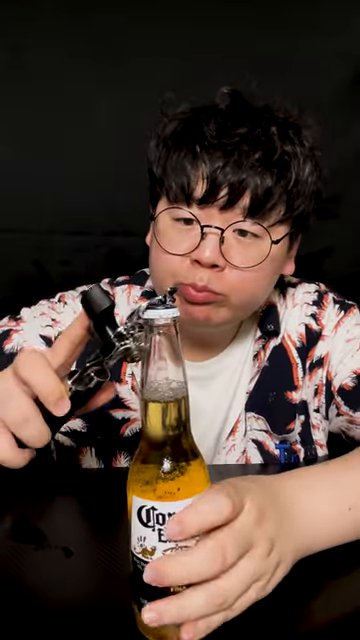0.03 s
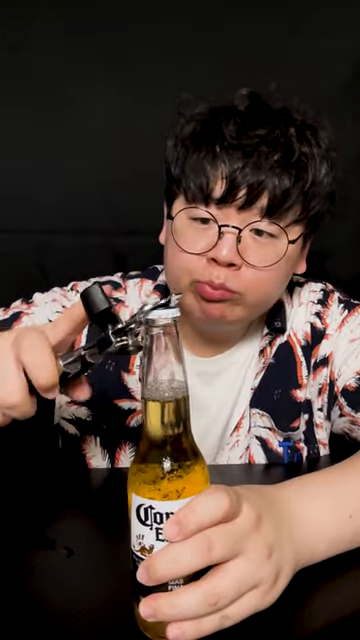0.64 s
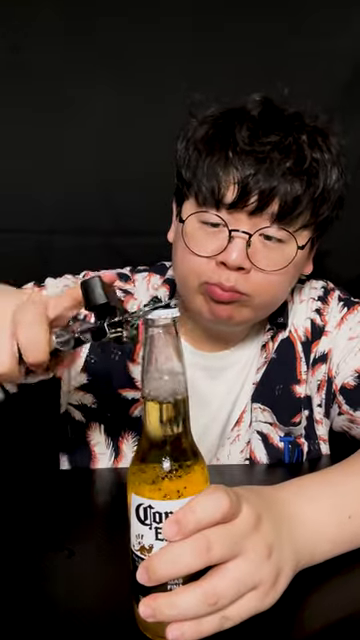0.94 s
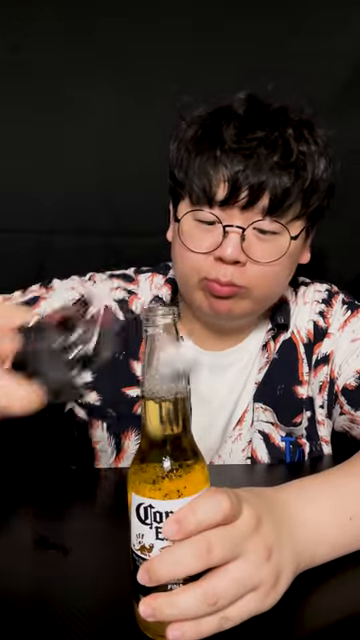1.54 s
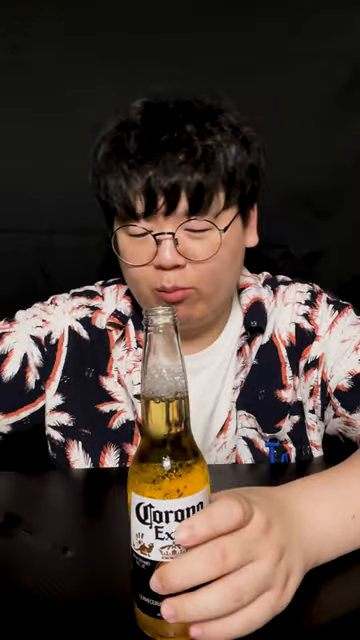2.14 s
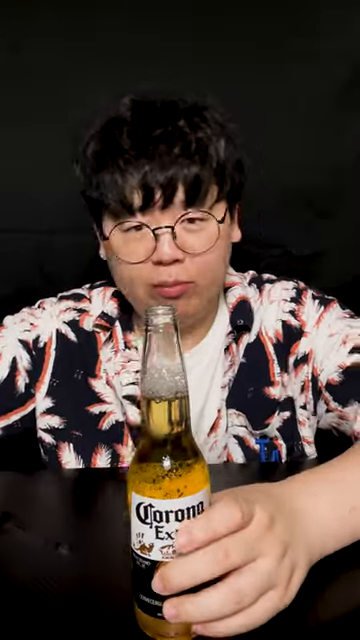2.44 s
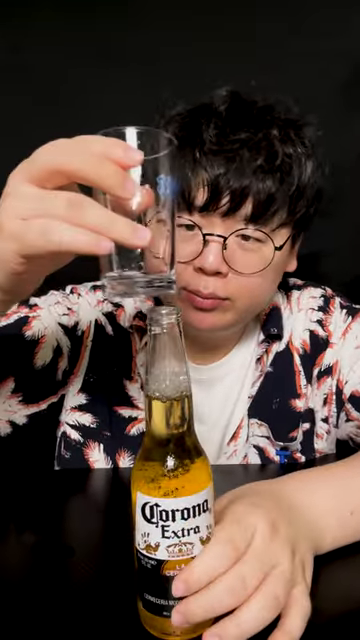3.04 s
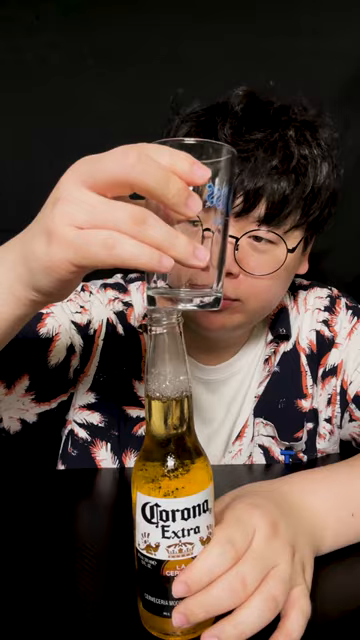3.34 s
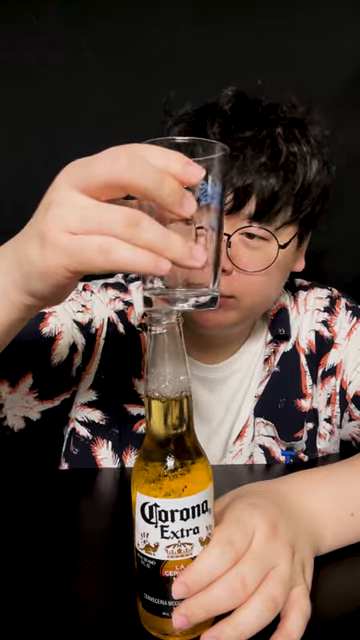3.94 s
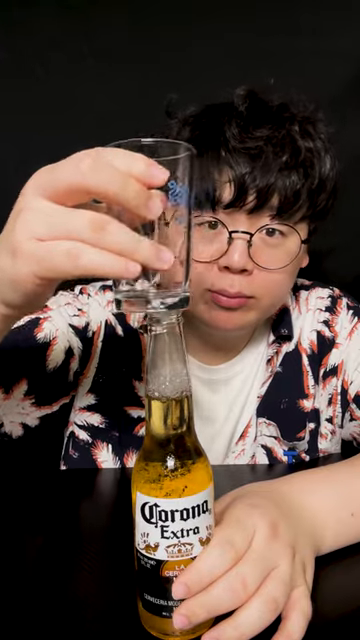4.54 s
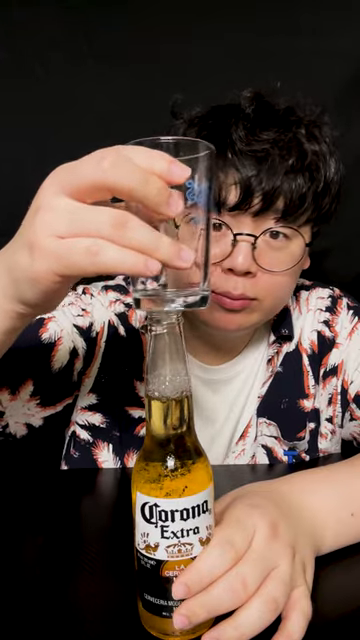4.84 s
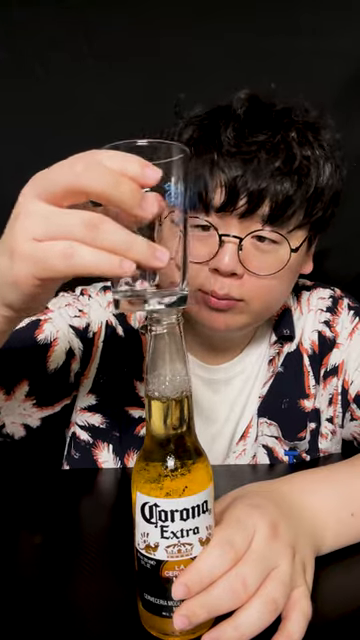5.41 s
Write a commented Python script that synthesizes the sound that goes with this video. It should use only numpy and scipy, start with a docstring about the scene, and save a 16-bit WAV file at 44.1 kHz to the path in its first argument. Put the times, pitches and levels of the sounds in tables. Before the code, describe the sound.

A steel opener clicks against a beer bottle's cap and gas escapes in a short, bright hiss. The bottle bumps the table, then the cap scrapes free, bounces with high metallic rings and rocks to rest. After a brief pause, a drinking glass is set on the bottle's mouth and slides about, knocking and grinding over a faint hollow tone. Everything is close to the microphone in a small, quiet room.

```python
"""A beer bottle is opened on a table in a small room. The steel opener bites and the bottle bumps the
table; gas hisses through the crimp. The crown cap drags off the opener, bounces and skids on the
table, rings in the air between landings and rocks to rest. Then the base of a drinking glass is set on
the bottle's mouth and slides about, knocking and grinding, while the air in the neck sings."""
import sys
import numpy as np
from scipy import signal
from scipy.fft import rfft, irfft
from scipy.io import wavfile

SR = 44100
rng = np.random.default_rng(int(sys.argv[2]) if len(sys.argv) > 2 else 0)


def master(y):
    """Save y as 16-bit WAV."""
    cut = np.clip(np.atleast_2d(y).T, -1, 1)
    pcm = np.round(cut * 32767)  # scale
    wavfile.write(sys.argv[1], SR, pcm.astype(np.int16))


N = 245637
TIME_S = np.arange(N) / SR
BINS_HZ = np.maximum(np.fft.rfftfreq(2 ** 19, 1 / SR), 1)


def from_db(db):
    """Decibels to amplitude."""
    return 10 ** (np.asarray(db) / 20)


def at_hz(rows, hz):
    """Table columns interpolated over log frequency."""
    points, *columns = np.transpose(rows)
    return np.squeeze([np.interp(np.log(hz), np.log(points), c) for c in columns])


def spectrum_of(x):
    """Zero-padded spectrum on BINS_HZ."""
    return rfft(x, 2 * (len(BINS_HZ) - 1))


def colour(x, spectrum):
    """Minimum-phase filter that keeps the power of white noise."""
    cepstrum = irfft(np.log(from_db(at_hz(spectrum, BINS_HZ))))[:len(BINS_HZ) - 1]
    cepstrum[1:] *= 2
    response = np.exp(spectrum_of(cepstrum))
    response /= np.sqrt(np.mean(abs(response) ** 2))
    return irfft(spectrum_of(x) * response)[..., :N]


def noise_pair():
    """Two independent white noises."""
    return rng.standard_normal((2, N))


def drift(rate_hz):
    """Random wander between unit-variance knots."""
    knots = rng.standard_normal(int(rate_hz * N / SR) + 2)
    return np.interp(TIME_S * rate_hz, np.arange(len(knots)), knots)


def clicks(times_s, levels_db):
    """One impulse per contact."""
    out = np.zeros(N)
    out[np.round(np.asarray(times_s) * SR).astype(int)] = from_db(levels_db)
    return out


def ring(force, hz, t60_s, rise_s=0):
    """Damped complex mode with a smoothed onset; a plain envelope at 0 Hz."""
    turn = np.exp(2j * np.pi * hz / SR)
    tone = signal.lfilter([1], [1, -from_db(-60 / (t60_s * SR)) * turn], force + 1e-18)
    lag = np.exp(-1 / (rise_s * SR)) if rise_s else 0
    return signal.lfilter([1 - lag], [1, -lag * turn], tone)


def bursts(times_s, levels_db, t60_s, rise_s=0):
    """Dense modes of a damped body: two noises decaying after each blow."""
    return ring(clicks(times_s, levels_db), 0, t60_s, rise_s).real * noise_pair()


# left-right likeness: f/Hz, correlation
STEREO_LIKENESS = [(100, 0.99), (300, 0.99), (700, 0.72), (1500, 0.28), (3000, 0.054), (6000, 0.22),
                   (12000, 0.83)]
def spread(pair):
    """Two independent signals become left and right, alike in the bass."""
    alike = np.clip(at_hz(STEREO_LIKENESS, BINS_HZ), -.9, 1)
    mid, side = pair
    side = irfft(spectrum_of(side) * np.sqrt((1 - alike) / (1 + alike)))[:N]
    return np.array([mid + side, mid - side])


# microphone ports, left against right: f/Hz, level/dB, lead/rad
MIC_PORTS = [(193.7, 14, -1), (613.4, -5.5, 0.4), (1050, -2, -0.07), (1705, -3.5, -0.12), (2400, -4.5, 1),
             (3560, 4.5, 2), (4670, 4.5, 1.5), (5500, 4.5, 1.18), (6830, -0.5, 2), (9150, 2.5, 3),
             (11420, 0, 0.88), (15000, -0.5, 1)]
def ports(tone, hz):
    """A complex tone reaches the two ports with different level and phase."""
    pan_db, lead_rad = at_hz(MIC_PORTS, hz)
    half = np.array([[.5], [-.5]])
    return np.imag(tone * from_db(pan_db * half) * np.exp(1j * lead_rad * half))


def wavering_ring(force, hz, t60_s, rise_s, shift_hz):
    """A mode pulled to and fro in pitch by a shifting contact."""
    turn = np.exp(2j * np.pi * np.cumsum(shift_hz * drift(40)) / SR)
    return ports(ring(force / turn, hz, t60_s, rise_s) * turn, hz)


# background noise: f/Hz, level/dB
HUSH_SPECTRUM = [(20, -26), (40, -11.5), (60, -6.5), (160, -6.5), (280, -16), (500, -24), (1000, -32),
                 (2400, -29.5), (4500, -51), (8000, -65.5), (16000, -81.5)]
def hush(level_db=-56.5, drop_db=5.5, drop_at_s=2.906, drop_length_s=0.045):
    """Low background noise, turned down by the recorder's noise suppressor near 2.9 s."""
    dropped = np.clip((TIME_S - drop_at_s) / drop_length_s, 0, 1)
    return from_db(level_db - drop_db * dropped) * spread(colour(noise_pair(), HUSH_SPECTRUM))


# opener and hand on the bottle: t/s, click level/dB, knock level/dB
OPENER_HITS = [(0.0727, -31, -33.5), (0.191, -58.5, -39), (0.21, -88, -47.5), (0.379, -69, -55.5),
               (1.0581, -76, -42), (1.107, -65.5, -46), (1.3497, -75, -37.5), (1.3778, -54, -51),
               (1.4956, -39.5, -47), (2.8189, -99, -47)]
# opener's knock; metal jangle of opener and cap: f/Hz, level/dB
OPENER_SPECTRUM = [(35, -33.5), (60, 0), (231, 0), (642, -11.5), (778, -12.5), (1100, -23), (1260, -17),
                   (1560, -27.5), (2470, -26.5), (2940, -33.5), (3710, -60.5), (4000, -44), (6000, -51.5),
                   (7800, -66.5), (13200, -120)]
JANGLE_SPECTRUM = [(3000, -19.5), (6000, 5), (8200, -16.5), (11000, 4.5), (14000, -1), (16000, -5.5)]
# steel opener: f/Hz, level/dB, t60/s
STEEL_MODES = [(1228, -6, 0.12), (2080, -2.5, 0.025), (2826, 0.5, 0.03), (3730, -6, 0.049)]
def opener():
    """Steel bites on the cap with a knock and a click, and rings."""
    times_s, click_db, knock_db = np.transpose(OPENER_HITS)
    knock = colour(bursts(times_s, knock_db + 0.5, t60_s=0.14, rise_s=0.0017), OPENER_SPECTRUM)
    click = colour(bursts(times_s, click_db - 1.5, t60_s=0.02), JANGLE_SPECTRUM)
    strike_db = (click_db + knock_db) / 2
    steel = sum(ports(ring(clicks(times_s, strike_db + mode_db), hz, t60_s), hz)
                for hz, mode_db, t60_s in STEEL_MODES)
    return spread(knock + click) + steel


# bottle on the table: t/s, level/dB, f/Hz
BOTTLE_BUMPS = [(0.079, -43, 163), (0.205, -28, 165), (0.242, -35.5, 188), (1.058, -22, 122),
                (1.113, -22, 105.7), (1.141, -32, 71), (3.214, -26, 149.4)]
def bottle_bumps(t60_s=0.057, rise_s=0.0032):
    """The hand's effort bumps the bottle softly on the table."""
    return sum(ring(clicks([at_s], db), hz, t60_s, rise_s).imag for at_s, db, hz in BOTTLE_BUMPS)


# gas jet: f/Hz, level/dB
GAS_SPECTRUM = [(180, -66), (300, -19), (348, -19), (439, -29.5), (517, -24), (922, -29), (1510, -24),
                (2560, -11.5), (3070, -26.5), (3230, -18.5), (5480, -8), (6680, -10), (8280, -30),
                (10300, -0.5), (15500, 0)]
def gas(start_s=0.7955, attack_s=0.047, hold_s=0.049, fall_db_per_s=516.5, jet_db=-21, darken_db=4.5):
    """A bright jet leaks through the crimp, darkening and dying as the pressure is spent."""
    age_s = TIME_S - start_s
    open_s = attack_s + hold_s
    flow = np.clip(age_s / attack_s, 0, 1) * from_db(-fall_db_per_s * np.clip(age_s - open_s, 0, .5))
    jet = flow * from_db(jet_db) * noise_pair()
    low = signal.sosfilt(signal.butter(1, 6000, fs=SR, output="sos"), jet)
    spent = np.clip(2 * (age_s - attack_s) / open_s - .5, -2, 2)
    return spread(colour(jet + low * (from_db(darken_db * spent) - 1), GAS_SPECTRUM))


# cap on the opener, then the table; edge is high edge-on, low when flat:
# t/s, ring level/dB, edge/dB, knock level/dB, crack level/dB
CAP_BOUNCES = [(1.38, -52, -3.5, -54, -55), (1.442, -45.5, -7.5, -56, -64.5),
               (1.4673, -38, -24.5, -59, -59), (1.4949, -26.5, -17.5, -39, -70),
               (1.509, -16, -17, -56, -44.5), (1.5463, -22, -18.5, -45, -34.5),
               (1.7103, -24.5, 1.5, -12.5, -26), (1.9992, -13, -12, -21, -49.5),
               (2.0655, -36, -10, -30, -32.5), (2.0797, -34.5, 0, -30.5, -37),
               (2.1448, -13, -19, -31, -32.5), (2.1575, -15, -6, -27, -27.5),
               (2.1716, -20, -10.5, -22, -24), (2.2113, -6.5, -36.5, -26.5, -17.5),
               (2.2173, -14.5, -23, -30.5, -22), (2.2282, -16.5, -33.5, -27, -26.5),
               (2.2625, -30, -26, -28, -39), (2.3236, -8.5, -30.5, -29, -18)]
def cap_contacts(rock_start_s=2.3762, first_gap_s=.0495, gap_ratio=.905, touches=6):
    """Columns of the bounces, then of the rocking to rest: each touch sooner and weaker."""
    k = np.arange(touches)
    times_s = rock_start_s + first_gap_s * (1 - gap_ratio ** k) / (1 - gap_ratio)
    ring_db = -23.5 - 6.5 * k
    edge_db = np.full(touches, -27)
    knock_db = -36.5 - 1.5 * k
    crack_db = -31.5 - 5.5 * k
    return np.hstack([np.transpose(CAP_BOUNCES), [times_s, ring_db, edge_db, knock_db, crack_db]])


# cap modes: f/Hz
CAP_MODES_HZ = [5385, 5600, 5632, 6800, 6865, 9350, 10800, 11560, 13170, 14380, 14890]
# same modes: level/dB, t60/s
CAP_MODE_DECAYS = [(-9, 0.041), (-5, 0.064), (-9, 0.11), (-20.5, 0.042), (5.5, 0.099), (7, 0.037),
                   (-4.5, 0.049), (-15, .08), (-2, 0.087), (-2, .05), (-3, 0.036)]
# cap's crack and rasp: f/Hz, level/dB
CRACK_SPECTRUM = [(1500, -20.5), (3000, 5), (5000, 13.5), (8000, -9.5), (12000, -1), (16000, -24)]
def cap(scatter_db=1.0):
    """Each contact cracks and rings the cap; edge-on, the high modes ring and the crimps jangle."""
    times_s, ring_db, edge_db, _, crack_db = cap_contacts()
    high_db = ring_db + edge_db
    middle_db = ring_db - 3 + 0.79 * edge_db
    jangle = bursts(times_s, high_db - 7.5, t60_s=0.026, rise_s=.0003)
    crack = bursts(times_s, crack_db + 4, t60_s=0.0086, rise_s=.0003)
    out = spread(colour(crack, CRACK_SPECTRUM) + colour(jangle, JANGLE_SPECTRUM))
    strike_spectra = [(5600, *ring_db), (6800, *middle_db), (13000, *high_db)]
    losses_db = scatter_db * rng.standard_normal((len(times_s), len(CAP_MODES_HZ)))
    for hz, (mode_db, t60_s), loss_db in zip(CAP_MODES_HZ, CAP_MODE_DECAYS, losses_db.T):
        force = clicks(times_s, at_hz(strike_spectra, hz) + mode_db - loss_db)
        out += wavering_ring(force, hz, t60_s, rise_s=0.0009, shift_hz=7.2)
    return out


def cap_drag(start_s=1.38, end_s=1.495, level_db=-66.5, teeth_db=7.0):
    """The loose cap's crimps rasp along the opener's jaw."""
    rasp = (TIME_S > start_s) * (TIME_S < end_s) * from_db(level_db + teeth_db * drift(270))
    return spread(colour(rasp * noise_pair(), CRACK_SPECTRUM))


# table top's thud and knock: f/Hz, level/dB
THUD_SPECTRUM = [(40, -21.5), (75, -13), (120, 0), (170, -4), (290, 0), (420, -2.5), (700, -10.5),
                 (1500, -20.5), (5000, -48.5)]
KNOCK_SPECTRUM = [(100, -34), (350, -9), (530, -3.5), (800, -0.5), (1250, -0.5), (1650, -9), (2200, 1),
                  (2700, 0.5), (3600, -10.5), (5000, -11.5), (8000, -43.5)]
# table top: f/Hz, level/dB, t60/s
TABLE_TOP_MODES = [(527.8, -10.5, 0.13), (786.4, -16, 0.21), (2180, -17, 0.23), (2300, -27.5, 0.36)]
def table_top(thud_limit_db=-27.5):
    """The table knocks and rings under the cap, thuds up to a limit, and rasps as the rim skids."""
    times_s, _, _, knock_db, _ = cap_contacts()
    rasp = skid_envelope(times_s, knock_db - 16)
    thud_db = np.minimum(knock_db - 8, thud_limit_db)
    low = bursts(times_s, thud_db, t60_s=0.093, rise_s=0.0014) + rasp * noise_pair()
    high = bursts(times_s, knock_db - 5, t60_s=0.084) + rasp * noise_pair()
    rings = sum(ports(ring(clicks(times_s, knock_db + mode_db - 0.5), hz, t60_s), hz)
                for hz, mode_db, t60_s in TABLE_TOP_MODES)
    return spread(colour(low, THUD_SPECTRUM) + colour(high, KNOCK_SPECTRUM)) + rings


def skid_envelope(times_s, kicks_db, start_s=1.95, end_s=2.4, glide_db=-52.5, slowing_db_per_s=19.5,
                  t60_s=0.25, teeth_db=6.5):
    """The cap skids on its crimped rim, slowing down; each landing adds a fading kick."""
    glide = from_db(glide_db - slowing_db_per_s * (TIME_S - start_s))
    kick_power = ring(clicks(times_s, 2 * kicks_db), 0, t60_s / 2).real
    skidding = (TIME_S > start_s) * (TIME_S < end_s)
    return skidding * (glide + np.sqrt(kick_power)) * from_db(teeth_db * drift(250))


# bounce that sets the cap ringing: t/s, level/dB
RINGING_BOUNCE = [(2.158, -19.5)]
# cap in the air: f/Hz, level/dB, t60/s
FLYING_CAP_MODES = [(4634, -6, .33), (6672, -4, .35), (6835, -6, .3), (7800, -17, .15), (9102, -5, .3),
                    (10920, -18, .25), (11605, 1, .36), (12705, -5, .28), (13670, -15, .3)]
def flying_cap(landing_s=2.32, damping_db_per_s=202):
    """After a bounce, the cap rings high and clear in the air until a landing damps it."""
    bounce = clicks(*np.transpose(RINGING_BOUNCE))
    damping = from_db(-damping_db_per_s * np.clip(TIME_S - landing_s, 0, 1))
    return damping * sum(ports(from_db(mode_db) * ring(bounce, hz, t60_s), hz)
                         for hz, mode_db, t60_s in FLYING_CAP_MODES)


# glass and bottle in contact: f/Hz, level/dB, t60/s
CONTACT_MODES = [(1628.6, 4, 0.039), (1694, 4, 0.061), (2428, -11.5, 0.046), (2715, -12, 0.068),
                 (3795, 6, 0.03), (3843, -5, 0.19), (4787, -10, 0.17), (6570, 0.5, .11),
                 (6720, -5.5, 0.074), (6810, -1.5, 0.22), (7680, -0.5, 0.071), (8070, -0.5, 0.095),
                 (8300, -19.5, .1), (12400, -15, 0.074), (13500, -12.5, .11), (15330, -14, .11)]
def glass_mode(force, hz, t60_s, rise_s, detune_hz=15):
    """The bottle's lip detunes a mode of the glass, the more so the more it damps it."""
    return wavering_ring(force, hz, t60_s, rise_s, detune_hz * np.sqrt(CONTACT_MODES[0][2] / t60_s))


# glass on the bottle's mouth: t/s, level/dB, wall clink/dB re level, hardness/dB re level
GLASS_KNOCKS = [(3.2096, -19, -18.5, -16), (3.2254, -44, 0.5, -2.5), (3.3967, -36, -23, -25.5),
                (3.5265, -30.5, -16.5, -39), (3.5418, -34.5, -16, -21.5), (3.6038, -31.5, -15, -25),
                (3.6411, -29, 2.5, -8), (3.7467, -34, -39, -26), (3.861, -26, -31, -20.5),
                (3.8742, -32.5, -31, -28), (4.0901, -38, -12, -27), (4.2602, -37, -3.5, -26),
                (4.2975, -32, -18, -27.5), (4.366, -39.5, -35, -36), (4.5343, -41.5, -13, -32),
                (4.6466, -38.5, -3, -20), (4.814, -30.5, -23, -30.5), (5.0023, -38, -9, -27),
                (5.013, -29.5, -0.5, -17), (5.1423, -33.5, -38, -30), (5.212, -24.5, -14, -26),
                (5.464, -25.5, 0.5, -18.5), (5.5575, -33, -31, -26)]
# contact crunch; body of the glass: f/Hz, level/dB
CRUNCH_SPECTRUM = [(1000, -9.5), (2600, -5.5), (3700, 10.5), (4300, -6), (5800, -11.5), (6700, -9.5),
                   (8300, -8), (9500, -52.5), (14000, -26)]
BODY_SPECTRUM = [(40, -36.5), (90, -1.5), (180, 0.5), (340, 9.5), (700, 1.5), (1050, 6.5), (1400, -13.5),
                 (1900, -3), (2700, -16.5), (3600, -19.5), (4500, -69), (8000, -74), (10000, -50)]
def glass_knocks(scatter_db=1.5):
    """The glass rocks and drops on the lip with a crunch; harder contacts reach higher modes."""
    times_s, clunk_db, wall_db, hardness_db = np.transpose(GLASS_KNOCKS)
    clink_db = clunk_db + wall_db
    sparkle_db = clunk_db + hardness_db
    crunch = colour(bursts(times_s, clink_db - 7, t60_s=0.071, rise_s=0.0022), CRUNCH_SPECTRUM)
    body = colour(bursts(times_s, clunk_db - 2, t60_s=0.086, rise_s=0.0018), BODY_SPECTRUM)
    out = spread(body + crunch)
    strike_spectra = [(1700, *clunk_db), (2500, *clunk_db), (3800, *clink_db), (6700, *sparkle_db)]
    chance_db = scatter_db * rng.standard_normal((len(times_s), len(CONTACT_MODES)))
    for k, (hz, mode_db, t60_s) in enumerate(CONTACT_MODES):
        force = clicks(times_s, at_hz(strike_spectra, hz) + mode_db + chance_db[:, k])
        polarity = (-1) ** k   # opposed neighbours swell, then beat
        out += polarity * glass_mode(force, hz, t60_s, rise_s=0.0009)
    return out


RUB_START_S, RUB_DB = 3.3, -56.5
# harder scrapes on the lip: t/s, level/dB
LIP_SCRAPES = [(3.383, -47), (3.554, -41), (3.75, -54), (3.846, -39.5), (4.114, -44.5), (4.36, -52.5),
               (4.685, -49), (4.783, -44.5), (5.16, -46), (5.56, -48)]
def rub_envelope(attack_s=.015, release_s=0.04):
    """How hard the glass grinds: a steady rub, and scrapes that swell and relax."""
    swells = sum(from_db(db) * np.exp(-np.maximum((at_s - TIME_S) / attack_s, (TIME_S - at_s) / release_s))
                 for at_s, db in LIP_SCRAPES)
    return (TIME_S > RUB_START_S) * np.hypot(from_db(RUB_DB), swells)


# glass grinding on glass: f/Hz, level/dB
GRIND_SPECTRUM = [(50, -26.5), (150, 5.5), (350, 4.5), (800, 6), (1350, -2), (2400, -10), (3500, -20),
                  (4400, -62), (8000, -42.5), (10000, -57)]
def glass_slide(grind_db=-1.5, grit_db=6.5, sizzle_db=-28.5, grain_db=4.5, catch_db=7.0, ring_db=-26.0,
                tilt_db_per_octave=-9.0):
    """Glass grinds on glass with a fine sizzle; tiny catches of the lip keep the modes ringing."""
    rub = rub_envelope()
    friction = rub * noise_pair()
    sizzle = rub * from_db(sizzle_db + grain_db * drift(400)) * noise_pair()
    grind = friction * from_db(grind_db + grit_db * drift(120))
    out = spread(colour(grind, GRIND_SPECTRUM) + colour(sizzle, CRUNCH_SPECTRUM))
    catches = friction[0] * from_db(catch_db * drift(200))
    lowest_hz, _, lowest_t60_s = CONTACT_MODES[0]
    for hz, mode_db, t60_s in CONTACT_MODES:
        softness_db = tilt_db_per_octave * min(np.log2(hz / lowest_hz), 2)   # rubbing is a soft contact
        gain = from_db(mode_db + ring_db + softness_db) * np.sqrt(lowest_t60_s / t60_s)
        out += gain * glass_mode(catches, hz, t60_s, rise_s=0.0013)
    return out


# glass tilting on the lip: t/s, pitch rise/Hz
GLASS_TILTS = [(3.487, 169.3), (3.691, 141), (4.17, 70), (4.31, 70), (4.504, 130), (4.89, 115),
               (5.119, 71.8), (5.38, 81.2)]
def neck_air(rest_hz=1034, wobble=0.024, tilt_s=0.034, start_db=-43.5, fade_db_per_s=3,
             leak_db_per_hz=0.1, rub_exponent=0.43):
    """Rubbing makes the neck's air resonate; each tilt widens the gap, so it leaks and rises in pitch."""
    rise_hz = sum(hz * np.exp(-((TIME_S - at_s) / tilt_s) ** 2) for at_s, hz in GLASS_TILTS)
    level_db = start_db - fade_db_per_s * (TIME_S - RUB_START_S) - leak_db_per_hz * rise_hz
    drive = (rub_envelope() / from_db(RUB_DB)) ** rub_exponent * from_db(level_db)
    pitch_hz = (rest_hz + rise_hz) * (1 + wobble * drift(30))
    turn = np.exp(2j * np.pi * np.cumsum(pitch_hz) / SR)
    air = ring(rng.standard_normal(N) / turn, 0, t60_s=0.038, rise_s=.001) * turn
    return ports(drive * air / np.std(air.imag), rest_hz)


# reverberation decay: f/Hz, t60/s
ROOM_DECAY = [(100, 0.22), (500, 0.3), (2000, 0.2), (6000, 0.41), (14000, 0.24)]
# reverberation strength: f/Hz, level/dB
ROOM_SPECTRUM = [(100, -2.5), (500, -8), (2300, -8.5), (6000, -21), (14000, -16.5)]
def room(x, first_echo_s=0.0033):
    """Diffuse reflections follow the first wall echo and die band by band."""
    age_s = TIME_S[:SR]
    edges_hz = np.geomspace(50, 17000, 11)
    tail = np.zeros((2, N))
    for low_hz, high_hz in zip(edges_hz, edges_hz[1:]):
        hz = np.sqrt(low_hz * high_hz)
        bandpass = signal.butter(2, [low_hz, high_hz], "band", fs=SR, output="sos")
        band = signal.sosfilt(bandpass, rng.standard_normal((2, SR)))
        decay = from_db(-60 * age_s / at_hz(ROOM_DECAY, hz)) * (age_s > first_echo_s)
        tail[:, :SR] += band * decay / np.linalg.norm(decay) * from_db(at_hz(ROOM_SPECTRUM, hz))
    return irfft(spectrum_of(x) * spectrum_of(spread(tail)))[:, :N]


def scene():
    """Bottle, cap and glass close by, with their reflections, over a low hush."""
    near = opener() + bottle_bumps() + gas()
    near += cap_drag() + cap() + table_top() + flying_cap()
    near += glass_knocks() + glass_slide() + neck_air()
    return near + room(near) + hush()


def record(dry, cutoff_hz=15900):
    """Steep elliptic low-pass."""
    return signal.sosfilt(signal.ellip(10, .2, 80, cutoff_hz, fs=SR, output="sos"), dry)


dry = scene()
out = record(dry)
master(out)
```